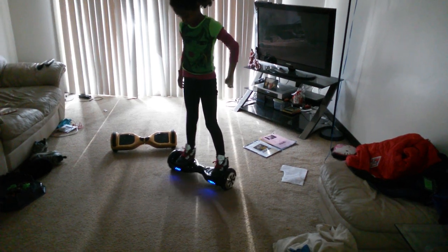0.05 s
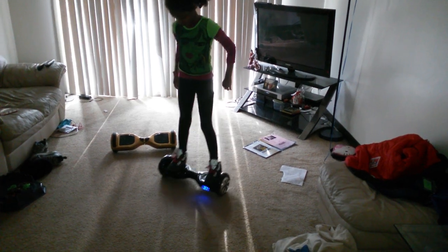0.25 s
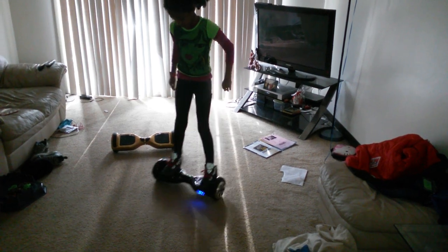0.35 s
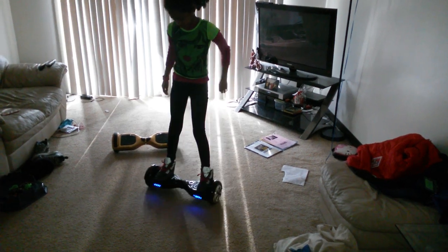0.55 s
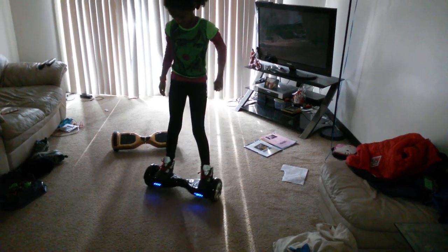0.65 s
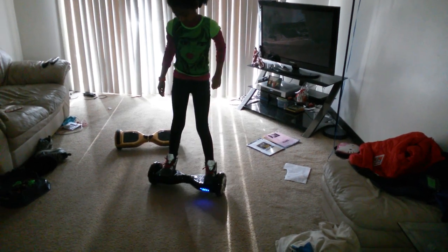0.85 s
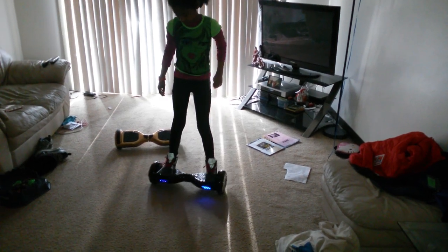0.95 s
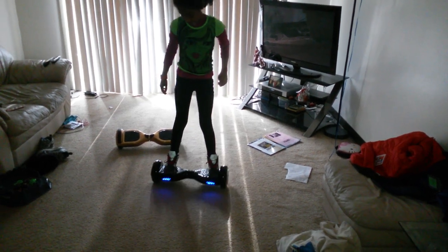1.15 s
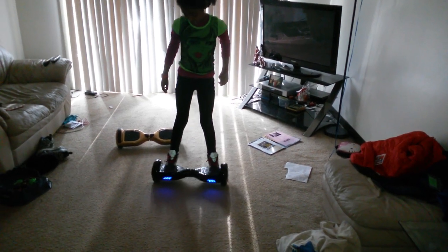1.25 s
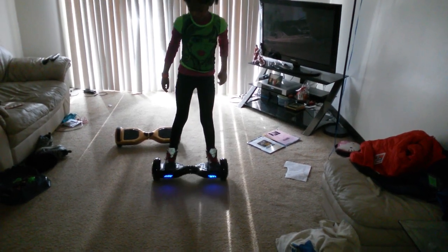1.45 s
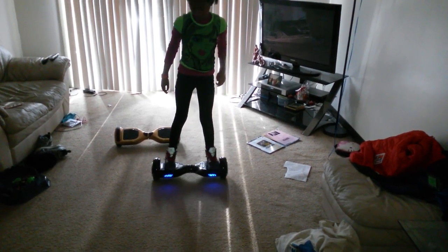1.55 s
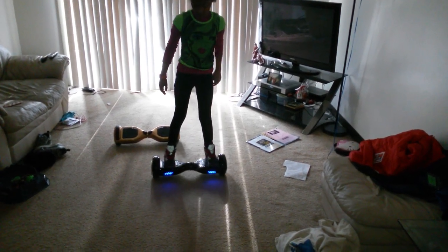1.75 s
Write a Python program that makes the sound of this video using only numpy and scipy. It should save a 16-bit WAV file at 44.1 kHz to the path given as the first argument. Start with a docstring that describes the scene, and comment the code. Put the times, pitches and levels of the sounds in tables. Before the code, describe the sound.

A hoverboard wheel shudders with a rapid clacking rattle, then its motors hum faintly.

```python
"""A hoverboard's wheel motor shudders about twenty times a second as the board turns on a carpet.
Each jerk clacks the loose wheel and knocks the plastic shell, over the straining motor's rough growl.
The motors sing and whine, then the board creeps on with a faint hum and one soft thud of the deck.
Under it lie a low rumble and a faint hiss. The living room adds a short echo to the shudder."""
import sys
import numpy as np
from scipy import signal
from scipy.fft import rfft, irfft, next_fast_len
from scipy.io import wavfile
from scipy.ndimage import map_coordinates

SR = 44100
rng = np.random.default_rng(int(sys.argv[2]) if len(sys.argv) > 2 else 0)


def materialize(psi):
    """Save the field psi as 16-bit PCM at rate SR to the path in sys.argv[1].

    A 1-D psi becomes a single channel; in a 2-D psi each row is a channel.
    """
    bounded = np.clip(np.atleast_2d(psi).T, -1, 1)
    quanta = np.round(bounded * 32767).astype(np.int16)
    wavfile.write(sys.argv[1], SR, quanta)


N = 79380

# jerks of the wheel (time [s], clack level [dB], knock level [dB])
JERKS = [(.1215, -57.5, -74), (0.1673, -46.5, -53), (0.2124, -37, -41), (0.263, -34.5, -34),
         (.311, -33, -29.5), (0.3604, -34, -34.5), (0.4103, -35.5, -37), (0.4592, -32.5, -28)]
# touches within one jerk (delay [s], level [dB])
TOUCHES = [(0, -2.5), (.0018, -3.5), (.0046, -9.5)]
# tone colour of a clack (frequency [Hz], level [dB])
CLACK_COLOUR = [(60, -48), (300, -17), (900, 2), (1300, -3.5), (2000, 4.5), (2600, -5), (3300, -3),
                (4000, -1), (4800, -3), (6200, -5), (8000, -11.5), (11000, -22), (14500, -43)]
# hollow ringing of the wheel housing (frequency [Hz], width [Hz], boost [dB])
HOUSING_PEAKS = [(1457, 100, 5), (1710, 98, 8.5), (1970, 120, -2.5), (3250, 230, 7), (3440, 140, 2),
                 (4390, 410, 7.5), (5100, 430, 7.5)]
# notes of the struck shell (frequency [Hz], level [dB], time to fade by 60 dB [s])
SHELL_NOTES = [(200, -8.5, 0.082), (287.5, -0.5, 0.12), (324, -1, 0.077), (404.7, -1.5, 0.12),
               (498.2, -1, 0.14), (623.4, 0, 0.088), (726.6, -1, 0.07), (829, -3, 0.063),
               (1075, -19.5, 0.16), (1145, -14, 0.087), (1422, -21.5, .09), (1718, -10.5, 0.066),
               (2016, -14, 0.13)]
# growl of the straining motor (time [s], level [dB])
GROWL_LEVEL = [(0, -64), (.08, -58.5), (.19, -51.5), (.225, -42.5), (.27, -39.5), (.31, -37), (.36, -38),
               (.41, -38.5), (.445, -39.5), (.465, -38), (.49, -42), (.53, -49), (.59, -57), (.7, -66)]
# tone colour of the growl (frequency [Hz], level [dB])
GROWL_COLOUR = [(60, -50), (140, -29), (190, -6.5), (290, 1), (355, -0.5), (420, 1.5), (510, 2.5),
                (555, -2), (640, -4), (850, -7), (980, -15.5), (2000, -21.5), (4000, -36.5), (8000, -80.5)]
# singing of the turning motor (time [s], level [dB])
SING_LEVEL = [(0, -74), (.05, -53.5), (.2, -54.5), (.3, -47), (.48, -46.5), (.56, -54), (.64, -56),
              (.7, -68), (1.0, -66.5), (1.4, -72.5), (1.62, -79), (1.71, -63.5), (1.8, -70)]
# higher whine of the motors (time [s], level [dB])
WHINE_LEVEL = [(0, -79), (.2, -72), (.3, -49), (.47, -42.5), (.56, -57), (.68, -70), (.76, -80),
               (.87, -66.5), (1.15, -66), (1.45, -67.5), (1.8, -71)]
# tone of the motor's magnets tugging, sinking as the wheel slows (time [s], pitch [Hz], level [dB])
MAGNET_TONE = [(0, 220.6, -61.5), (.15, 216.7, -62.5), (.26, 214.7, -54.5), (.36, 205, -54),
               (.46, 190.1, -59), (.55, 181.5, -59.5), (.67, 163.7, -66.5), (.88, 162, -77),
               (1.1, 155, -80)]
# low hum of the balancing motors (time [s], level [dB])
HUM_LEVEL = [(0, -72.5), (.5, -75), (.7, -69), (1.1, -69.5), (1.8, -68)]
# hum of the creeping board (time [s], level [dB])
CREEP_LEVEL = [(0, -61), (.6, -61), (.73, -66), (.86, -58), (1.1, -61.5), (1.35, -62), (1.55, -65.5),
               (1.8, -72.5)]
# peaks in that hum (frequency [Hz], width [Hz], level [dB])
CREEP_PEAKS = [(169, 49, -8), (204.6, 35, -5.5), (302.5, 11.3, -4), (329, 42, -1.5), (381.7, 10, 2.5),
               (443, 23, -0.5), (489.5, 26, -7), (523, 19.3, 2)]
# thud of the deck (time [s], level [dB])
DECK_THUDS = [(1.703, -53)]
# notes of the deck (frequency [Hz], level [dB], time to fade by 60 dB [s])
DECK_NOTES = [(115, -3, .15), (306, -1, 0.11), (388, -6, 0.076)]
# rumble of the wheels (time [s], level [dB])
RUMBLE_LEVEL = [(0, -62.5), (.45, -65.5), (.8, -60.5), (1.2, -60.5), (1.5, -64), (1.8, -61.5)]
# tone colour of the rumble (frequency [Hz], level [dB])
RUMBLE_COLOUR = [(15, -32), (33, -9.5), (55, 0), (100, 6.5), (160, -1), (300, -7.5), (520, -11), (700, -16),
                 (1000, -17), (2000, -22.5), (5000, -28.5)]
# faint hiss (time [s], level [dB])
HISS_LEVEL = [(0, -68.5), (.3, -60.5), (.62, -65), (.85, -68), (1.3, -69.5), (1.8, -69)]
# tone colour of the hiss (frequency [Hz], level [dB])
HISS_COLOUR = [(100, -15), (1000, 0), (2000, 2), (4000, 3.5), (8000, 2), (11000, 0), (13500, 3.5),
               (15000, 2)]
# the room's echo (frequency [Hz], time to fade by 60 dB [s])
ROOM_FADE = [(150, 0.63), (400, 0.35), (1000, 0.33), (4000, .35), (12000, 0.39)]
# how alike the room sounds at both ears (frequency [Hz], likeness [0 to 1])
EAR_LIKENESS = [(40, 0.31), (90, 0), (160, 0.65), (350, 0.8), (650, 0.21), (1100, 0), (3000, 0.068),
                (10000, 0)]
# balance between the sides (frequency [Hz], left minus right [dB])
BALANCE = [(700, -0.5), (4000, 0), (8000, 0), (13000, -4.5)]

SIDES = np.array([[1], [-1]])  # left, right
SHELL_LEAD_S, RISE_S = 0.0001, 0.0014  # the left ear's head start; how fast a blow builds up


def wheel_clacks():
    """Each jerk is a few hard touches in the hollow housing, then a fine chatter of loose parts."""
    touch_fade_s, chatter_fade_s, chatter_db = 0.0085, 0.09, -13
    out, t = np.zeros((2, N)), np.arange(SR // 8) / SR
    soft_peaks = [(hz, width, 0.21 * boost) for hz, width, boost in HOUSING_PEAKS]
    for start, db, _ in JERKS:
        hits = np.zeros(N)
        for delay, touch_db in TOUCHES:
            when = start + delay * rng.uniform(.8, 1.2)
            add(hits, when, fade(t, db + touch_db, touch_fade_s) * rng.standard_normal(len(t)))
        add(hits, start, fade(t, db + chatter_db, chatter_fade_s) * rng.standard_normal(len(t)))
        out += reach_ears(coloured(hits, CLACK_COLOUR, HOUSING_PEAKS), pan_db=4, lead_s=0.00006)
        echo = room_echo(coloured(hits, CLACK_COLOUR, soft_peaks))  # less of the housing's colour
        out += echo * amp(1.5 + 1.5 * SIDES)  # louder on the left
    return amp(-0.15) * out


def shell_knocks():
    """Each jerk gives a dead thud and rings the plastic shell."""
    knocks, t = np.zeros(N), np.arange(SR // 3) / SR
    thud_hz = 405
    thud = fade(t, db=5.5, fade_s=0.0152) * np.sin(2 * np.pi * thud_hz * t) * rise(t, RISE_S)
    for start, _, db in JERKS:
        add(knocks, start, amp(db) * (thud + amp(-5.5) * ring(SHELL_NOTES)))
    return reach_ears(knocks, pan_db=0, lead_s=SHELL_LEAD_S) + amp(-2.5) * room_echo(knocks)


def motor_growl():
    """Uneven kicks from the straining motor shake the shell, hardest around each jerk."""
    kicks_per_s, scatter_db = 700, 0.5
    swell_db, swell_delay_s, swell_width_s = 6, 0.007, 0.014
    t = np.arange(N) / SR
    swell = sum(np.exp(-((t - start - swell_delay_s) / swell_width_s) ** 2) for start, _, _ in JERKS)
    kicks = (rng.random(N) < kicks_per_s / SR) * rng.choice([-1, 1], N)
    kicks = kicks * amp(scatter_db * rng.standard_normal(N))
    level_db = curves(GROWL_LEVEL)[0] + swell_db * (swell - 1)
    growl = unit(coloured(kicks, GROWL_COLOUR)) * amp(level_db)
    return reach_ears(growl, pan_db=0, lead_s=SHELL_LEAD_S) + amp(-2) * room_echo(growl)


def small_shell(x, lowest_hz=163):
    """The shell is too small to give off much bass."""
    return signal.sosfilt(signal.butter(6, lowest_hz, "high", fs=SR, output="sos"), x)


def motor_tones():
    """The motors sing and whine unsteadily, over the magnets' sinking tone and a low hum."""
    sing = tone(hz=301, wander=0.0146, per_s=24.33)
    sing *= amp(curves(SING_LEVEL)[0] + 1.5 * wobble(29))
    whine = tone(hz=498.4, wander=0.0139, per_s=30.12)
    whine *= amp(curves(WHINE_LEVEL)[0] + 0.83 * wobble(34.6))
    magnet_hz, magnet_db = curves(MAGNET_TONE)
    magnets = tone(magnet_hz, wander=0.018, per_s=30.4)
    magnets *= amp(magnet_db + 1.1 * wobble(30))
    hum = tone(hz=117.5, wander=0.0252, per_s=12)
    hum *= amp(curves(HUM_LEVEL)[0] + 1.5 * wobble(12.5))
    return sing + whine + magnets + hum


def creeping_hum():
    """The motors' small balancing moves come in quick spurts: a fluttering hum of narrow noise bands."""
    top_hz, flutter_db = 566, 2

    def bands(hz):
        peaks = sum(amp(db) * peak(hz, centre, width) for centre, width, db in CREEP_PEAKS)
        return peaks / (1 + (hz / top_hz) ** 16)

    hum = filtered(room_noise(N), bands) * amp(flutter_db * wobble(per_s=65))
    return unit(hum) * amp(curves(CREEP_LEVEL)[0])


def deck_thud():
    """The deck settles softly on the carpet as the rider's weight shifts."""
    track = np.zeros(N)
    for start, db in DECK_THUDS:
        add(track, start, amp(db) * ring(DECK_NOTES))
    return track


def rumble_and_hiss():
    """Wheels rumble low on the carpet, under a faint hiss."""
    rumble = filtered(room_noise(N), lambda hz: amp(along(RUMBLE_COLOUR, hz)))
    hiss = filtered(room_noise(N), lambda hz: amp(along(HISS_COLOUR, hz)))
    return amp(curves(RUMBLE_LEVEL)[0]) * unit(rumble) + amp(curves(HISS_LEVEL)[0]) * unit(hiss)


def reach_ears(x, pan_db, lead_s):
    """Sound reaches the left ear first, then bounces back off the nearest wall, on the right."""
    wall_db, wall_delay_s = -9.5, 0.0165 + 0.00014 * SIDES
    direct = lambda hz: amp(pan_db * SIDES) * np.exp(1j * np.pi * hz * lead_s * SIDES)
    wall = lambda hz: amp(wall_db) * np.exp(-2j * np.pi * hz * wall_delay_s)
    return filtered(x, lambda hz: direct(hz) + wall(hz))


def room_echo(x):
    """The living room's short echo, each frequency dying away at its own speed."""
    gap_s, build_s = 0.0013, 0.0027
    hz, t, spectrum = signal.stft(room_noise(SR // 2), SR, nperseg=256)
    tail = signal.istft(spectrum * fade(t, 0, along(ROOM_FADE, hz)[:, None]), SR, nperseg=256)[1]
    since_gap = np.maximum(np.arange(tail.shape[1]) / SR - gap_s, 0)
    tail *= rise(since_gap, build_s)
    return signal.fftconvolve(x[None], tail / np.linalg.norm(tail[0]), axes=1)[:, :N]


def room_noise(size):
    """Noise from all around: alike at both ears in the low middle range, unrelated in the treble."""
    def shares(hz):
        angle = np.arccos(np.clip(along(EAR_LIKENESS, hz), -1, 1)) / 2
        return np.array([np.cos(angle), np.sin(angle)])

    shared, opposite = filtered(rng.standard_normal((2, size)), shares)
    return shared + SIDES * opposite


def ring(notes):
    """A struck part rings with several fading notes, a little different every time."""
    t = np.arange(SR // 3) / SR
    sound = np.zeros(len(t))
    for hz, db, fade_s in notes:
        strength = rng.choice([-1, 1]) * fade(t, db + rng.normal(0, 2.3), fade_s)
        sound += strength * np.sin(2 * np.pi * hz * (1 + rng.normal(0, 0.011)) * t)
    return sound * rise(t, RISE_S)


def tone(hz, wander, per_s):
    """A pure tone whose pitch drifts at random around hz."""
    pitch = hz * (1 + wander * wobble(per_s))
    return np.sqrt(2) * np.sin(2 * np.pi * np.cumsum(pitch) / SR)


def amp(db):
    """Turn decibels into a volume factor."""
    return 10 ** (np.asarray(db) / 20)


def fade(t, db, fade_s):
    """Start at db and fall by 60 dB every fade_s seconds."""
    return amp(db - 60 * t / fade_s)


def rise(t, rise_s):
    """Climb from 0 towards 1."""
    return 1 - np.exp(-t / rise_s)


def peak(hz, centre, width):
    """A hump of height 1 around one frequency."""
    return 1 / (1 + (2 * (hz - centre) / width) ** 2)


def unit(x):
    """Scale to an average power of 1."""
    return x / np.sqrt(np.mean(x ** 2) + 1e-20)


def along(table, hz):
    """Read a table at any frequency, with octaves evenly spaced."""
    known_hz, values = np.transpose(table)
    return np.interp(np.log(hz + 1), np.log(known_hz + 1), values)


def curves(table):
    """One value per sample for each column after the time."""
    times, *columns = np.transpose(table)
    return [np.interp(np.arange(N) / SR, times, column) for column in columns]


def wobble(per_s):
    """A smooth curve through per_s random points a second."""
    return map_coordinates(rng.standard_normal(1024), [np.arange(N) * per_s / SR], mode="mirror")


def filtered(x, response):
    """Multiply each frequency in x by response(hz)."""
    n = x.shape[-1]
    padded = next_fast_len(n + SR // 4)
    return irfft(rfft(x, padded) * response(np.fft.rfftfreq(padded, 1 / SR)), padded)[..., :n]


def coloured(x, colour, peaks=(), size=4096):
    """Give x a tone colour, with ringing peaks on top."""
    hz = np.fft.rfftfreq(size, 1 / SR)
    shape_db = along(colour, hz) + sum(db * peak(hz, centre, width) for centre, width, db in peaks)
    # fold the filter so that it rings only after a hit, never before
    folded = irfft(np.log(amp(shape_db)))
    folded[1:size // 2] *= 2
    folded[size // 2 + 1:] = 0
    ringing = irfft(np.exp(rfft(folded)))
    return signal.fftconvolve(x, ringing / np.linalg.norm(ringing))[:N]


def add(track, start_s, sound):
    """Mix a sound into the track."""
    part = track[max(0, round(start_s * SR)):][:len(sound)]
    part += sound[:len(part)]


def scene():
    """The shudder, the running motors, the deck and the background together."""
    shudder = wheel_clacks() + small_shell(shell_knocks() + motor_growl())
    return shudder + motor_tones() + creeping_hum() + deck_thud() + rumble_and_hiss()


def record(dry):
    """Make the left side duller than the right at the top, and cut the very highest treble."""
    top_hz = 14600
    return filtered(dry, lambda hz: amp(SIDES / 2 * along(BALANCE, hz)) * (hz < top_hz))


dry = scene()
out = record(dry)
materialize(out)
```